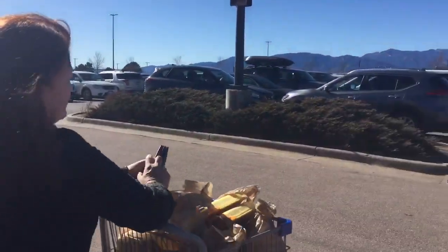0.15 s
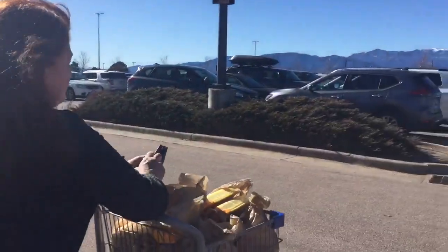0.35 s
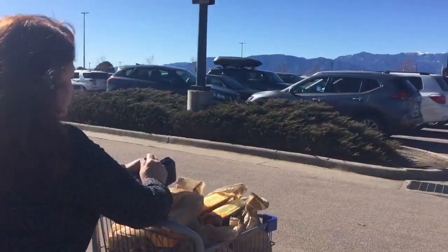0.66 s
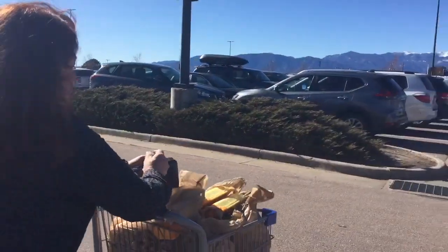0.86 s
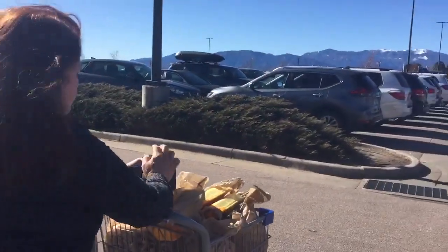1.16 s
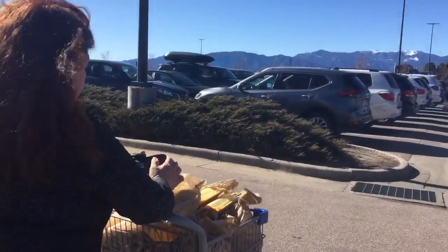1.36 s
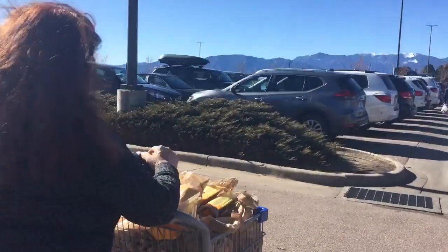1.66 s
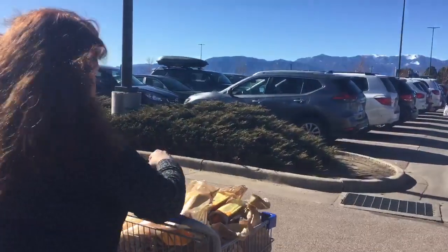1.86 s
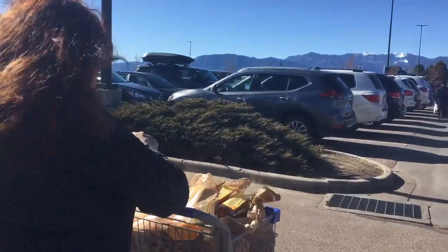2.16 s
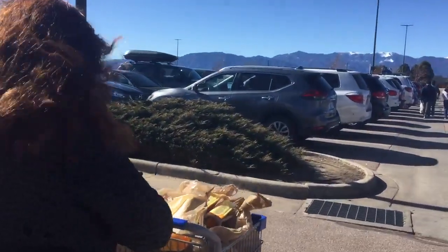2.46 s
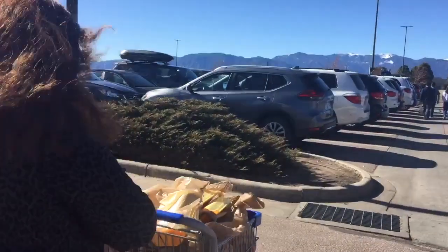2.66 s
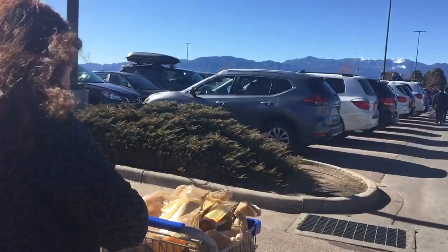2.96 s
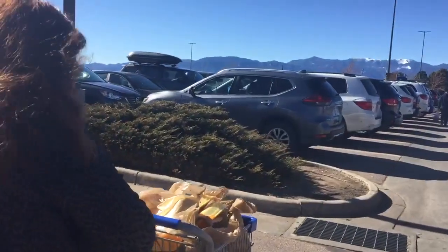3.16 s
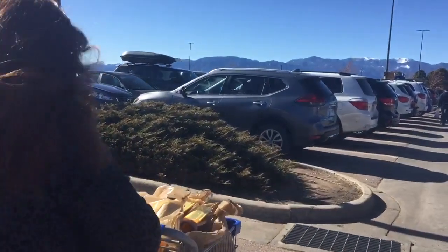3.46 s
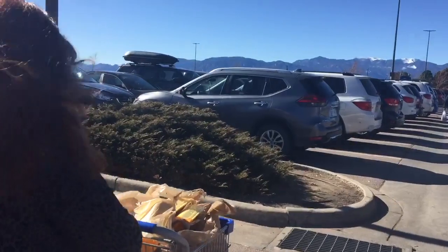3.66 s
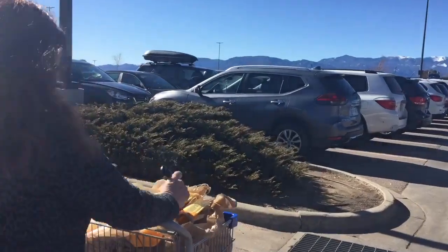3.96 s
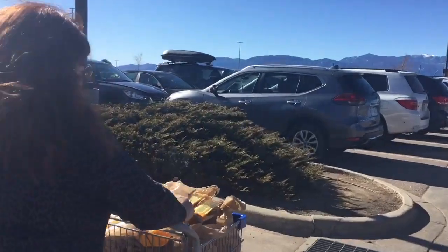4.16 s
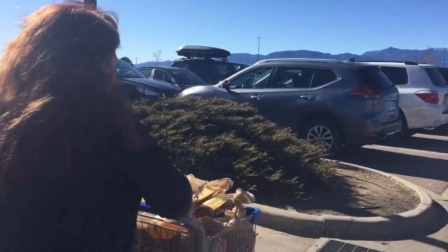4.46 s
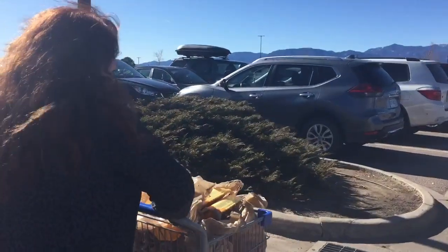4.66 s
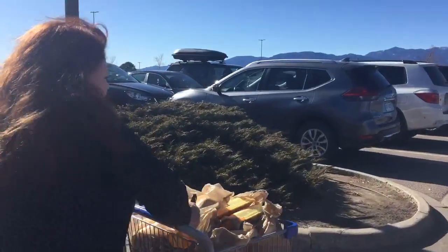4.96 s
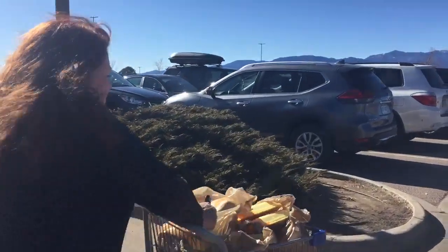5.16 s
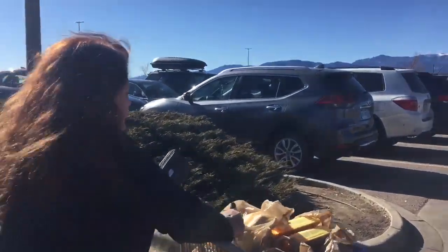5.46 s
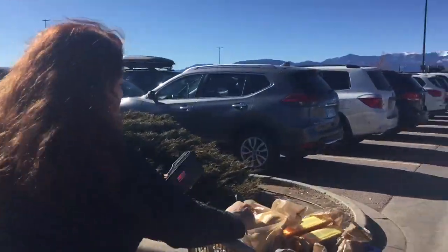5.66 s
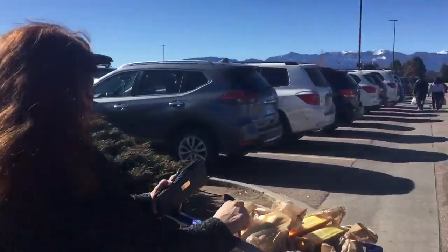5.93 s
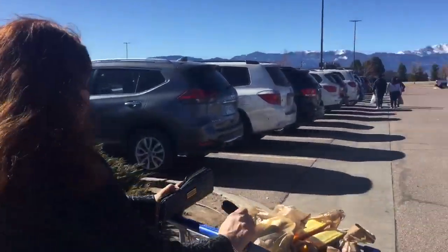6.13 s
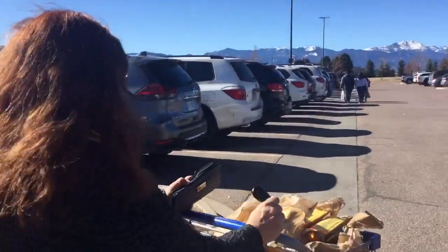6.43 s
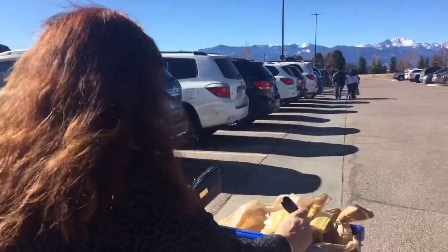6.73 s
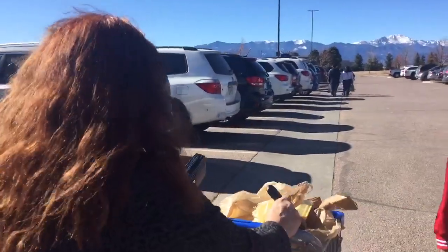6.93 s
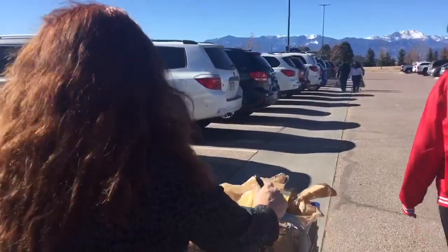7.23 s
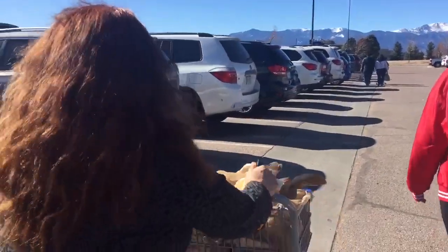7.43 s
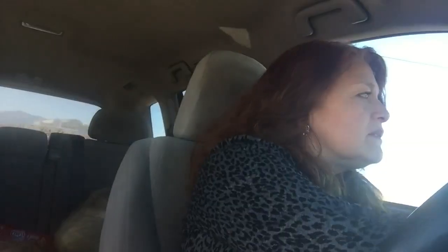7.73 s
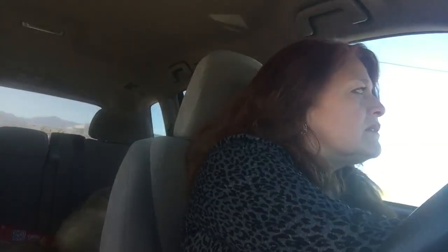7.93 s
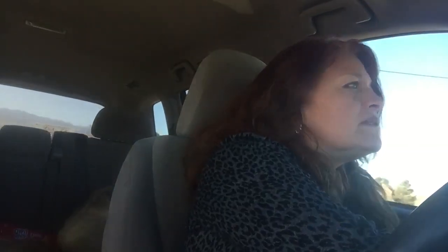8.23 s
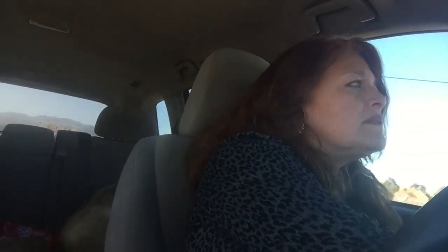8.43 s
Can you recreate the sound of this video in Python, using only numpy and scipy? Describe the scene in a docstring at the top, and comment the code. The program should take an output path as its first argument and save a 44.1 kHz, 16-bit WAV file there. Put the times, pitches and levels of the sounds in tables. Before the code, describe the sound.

Outdoors in an open parking lot, a loaded wire shopping cart chatters and jingles over grit, with wheels growling and bumps clashing the wires. Heavy wind gusts buffet and clip a handheld microphone, easing later. The cart nearly stops around the middle, then rolls on with its loudest clashes. A hard cut leads to a moving car's low, enclosed road rumble, ending with a tight click pair and a hollow knock.

```python
"""In a paved parking lot a loaded wire shopping cart is pushed along, then the cabin of a moving car is heard.
The cart is chattering wire contacts, shaken by random grit kicks and jolted by bumps; its wheels growl.
Wind is shaped turbulent noise in gusts, with short eddies slapping the microphone and clipping at full scale.
The cabin is filtered road noise with a swelling boom and tyre hiss. Clicks, one outdoors and a close pair
in the car, are decaying noise with ringing modes; a soft knock in the car is a decaying sine."""
import sys
import numpy as np
from scipy import signal
from scipy.fft import rfft, irfft
from scipy.io import wavfile
from scipy.ndimage import uniform_filter1d

SR = 44100
rng = np.random.default_rng(int(sys.argv[2]) if len(sys.argv) > 2 else 0)


def transcribe(signal):
    """Save signal, clipped to [-1, 1], as a 16-bit WAV file at the path in sys.argv[1]."""
    frames = np.atleast_2d(signal).T
    limited = np.clip(frames, -1, 1)
    pcm = np.round(limited * 32767).astype(np.int16)
    wavfile.write(sys.argv[1], SR, pcm)


N = 378812
TIME = np.arange(N) / SR
CUT_S = 7.632  # the car cabin replaces the parking lot
CUTOFF_HZ = 15800

# Levels and gains in the tables are relative: the functions add offsets or normalise.
# Steady hum of the lot, spectrum: [frequency_hz, gain_db]
LOT_SPECTRUM = [(20, -15.5), (50, 21.5), (150, -16.5), (300, 1.5), (450, -21), (700, -0.5), (1300, -4.5),
                (2500, -21.5), (5000, -35), (15000, -47)]
# Shaking of the basket as the cart rolls, nearly stopping at about 4.5 s: [time_s, level_db]
ROLL_LEVEL = [(0.0, -32), (0.83, -32), (1.02, -29.5), (1.63, -31), (1.8, -30), (2.89, -31.5), (3.05, -34.5),
              (3.99, -32), (4.43, -48), (4.65, -43), (4.88, -31.5), (5.39, -29), (6.45, -28), (6.73, -29),
              (7.45, -33), (7.62, -48)]
# Car cabin, spectrum: [frequency_hz, gain_db]
CABIN_SPECTRUM = [(20, -47), (45, -8.5), (75, -1.5), (130, -13), (250, -20), (400, -28.5), (650, -27.5),
                  (1100, -37), (1550, -31.5), (1750, -37.5), (2300, -38), (3000, -51.5), (4500, -65.5),
                  (15000, -73)]
# Boom and tyre resonances in the cabin: [frequency_hz, width_hz, gain_db]
CABIN_RESONANCES = [(79.3, 27, -7), (935, 76, 3), (1240, 110, 8.5)]
# Road noise in the cabin: [time_s, level_db, tyre_hiss_db]
ROAD_LEVEL = [(7.63, -21.5, -11), (7.85, -24, -0.5), (8.0, -20.5, -3), (8.2, -22, 4), (8.59, -22, 1)]
# Light breeze at the microphone between the gusts: [time_s, level_db]
BREEZE_LEVEL = [(0, -16.5), (1.0, -26), (1.4, -16.5), (2.0, -21.5), (2.7, -27.5), (3.2, -14.5), (3.65, -42),
                (4.3, -18), (4.8, -36.5), (5.4, -24.5), (6.1, -34), (7.6, -34)]
# Gusts that buffet the microphone, start being full strength: [start_s, hold_s, level_db]
WIND_GUSTS = [(0.0, 0.071, -11), (0.212, 0.18, -16.5), (0.383, 0.095, -10), (0.576, 0.053, -11),
              (0.724, .11, -10), (0.9, 0.06, -12.5), (1.353, 0.018, -14), (1.516, 0.12, -8),
              (1.691, 0.12, -12), (1.878, 0.026, -14.5), (2.059, 0.048, -7), (2.216, 0.036, -16.5),
              (2.344, 0.02, -6.5), (2.533, 0.029, -12.5), (2.856, 0.072, -21), (3.075, 0.021, -12.5),
              (3.279, .11, -10.5), (3.485, 0.034, -10.5), (3.787, 0.012, -19), (4.224, 0.098, -15.5),
              (4.574, 0.062, -18), (4.862, 0.029, -21.5), (5.038, .035, -21), (5.355, 0.015, -12.5),
              (5.439, 0.048, -13.5), (5.675, 0.3, -18), (6.104, 0.011, -22), (6.204, 0.0091, -26),
              (6.332, 0.011, -21), (6.666, 0.037, -17.5), (6.834, 0.037, -22.5)]
GUST_RISE_S, GUST_FALL_S = 0.016, 0.022
# Rumble of the wind, spectrum: [frequency_hz, gain_db]
WIND_SPECTRUM = [(12, -55.5), (25, -18), (37, -14), (60, 1.5), (100, -1.5), (170, -10.5), (280, -20.5),
                 (500, -41.5), (1000, -45), (2500, -93)]
# Single eddies that slap the microphone, crest relative to the level: [centre_s, level_db, crest_db]
EDDY_SLAPS = [(0.413, -3.5, -14), (0.498, -6.5, -6), (0.784, -4, -11.5), (0.818, -1.5, -20),
              (1.396, -5.5, -8.5), (1.585, -10, -4.5), (1.628, -9, -6), (1.726, -6, -26),
              (1.909, -11, -6.5), (2.086, -2.5, -13), (2.115, -19, 7.5), (2.432, -4.5, 0),
              (3.279, -23.5, 7.5), (3.319, -4, -5), (3.462, -16.5, 2.5), (3.505, -8, -14),
              (4.14, -10.5, -22), (4.238, -24, -15), (4.276, -5.5, -12), (4.49, -12.5, -29),
              (4.580, -15, -20), (5.052, -13, -5.5), (5.36, -9, -35), (5.775, -14.5, -3.5),
              (5.845, -7.5, -21)]
CREST_RISE_S = .002
# Small hard clicks: [start_s, level_db, upper_edge_hz, noise_t60_s]
CLICK_HITS = [(4.4224, -18, 4700, 0.0097), (8.3455, -16.5, 13000, 0.026), (8.35, -25, 10000, 0.056)]
# Modes that the clicks ring with: [pitch_hz, level_db, t60_s]
CLICK_RINGING = [(2250, 2, .045), (3639, -3, .04), (6137, 0, .04), (9060, -3, .035), (11000, -4, .035)]
# Bumps in the paving that clash the wires: [start_s, level_db, t60_s, treble_db]
PAVING_JOLTS = [(0.049, -22, 0.28, 2.5), (0.395, -27, 0.11, 9), (0.452, -23.5, 0.28, 5),
                (0.777, -20, 0.53, 3), (0.891, -27, 0.55, 6), (1.170, -24, 0.28, 8),
                (1.223, -19.5, 0.47, 7), (1.425, -22, 0.13, 2), (1.670, -22, 0.21, -3),
                (2.120, -40, .2, -4), (2.222, -34, 1, 11), (2.350, -25, 0.3, 7.5), (2.561, -24.5, 1, 3.5),
                (2.670, -17.5, .2, -0.5), (2.733, -17, 0.18, -4), (3.003, -21, 0.16, -17),
                (3.317, -24, 0.27, 6.5), (3.422, -32, 0.16, 8), (3.575, -25, 0.41, 1.5),
                (3.810, -36.5, 0.52, 10), (3.904, -21.5, 0.43, 3.5), (4.073, -39, 0.13, 14),
                (4.115, -29, 0.58, 3.5), (4.308, -30, 0.31, -24), (4.627, -33, .4, -1),
                (4.689, -27.5, 0.95, 2), (4.821, -22.5, 0.34, 1), (4.887, -16, 0.11, -2),
                (5.163, -20, 0.53, 6.5), (5.401, -27, 0.48, 5), (6.037, -35, .18, 12),
                (6.320, -20.5, 0.35, 4), (6.621, -19.5, 0.96, 6), (6.683, -14.5, 0.38, 7.5),
                (6.817, -16.5, 0.33, 6.5), (6.905, -28.5, 0.51, 11), (7.078, -22.5, 0.4, -4),
                (7.15, -14, 0.47, 2), (7.339, -22.5, 0.26, 5), (7.483, -25.5, 0.44, 4.5),
                (7.541, -25, 0.56, 1)]
JOLT_RISE_S = 0.0034
# Wires of the basket that ring most: [pitch_hz, level_db]
WIRE_MODES = [(2330, 6), (2412, 2), (2562, 1), (2735, 13), (3400, 12.5), (3585, 7.5), (3682, 8), (3811, -7),
              (4371, 11.5), (4595, 10), (5242, 10.5), (5407, 4.5), (5840, 13), (5952, -0.5), (8208, -15.5),
              (9024, 18), (9332, 8), (9530, 17), (11434, -4), (11779, 17), (13781, -16.5), (14618, -18.5),
              (14815, -4)]
WIRE_T60, MESH_T60 = .075, .11  # s
# Colouring filter of the rattling cart: [frequency_hz, gain_db]
RATTLE_SPECTRUM = [(210, -32), (350, -7), (520, -9.5), (703, -1.5), (851, -12), (1330, -4), (1460, -7.5),
                   (2390, 0), (3030, -7), (3490, -5), (4030, -6.5), (5890, -10), (9630, -15),
                   (10600, -16.5), (15500, -16.5)]
# Broad resonances of the basket frame: [frequency_hz, width_hz, gain_db]
FRAME_RESONANCES = [(686, 120, -8.5), (2360, 640, 12.5), (3490, 110, -1)]
USUAL_ROLL_DB, BRIGHTENING = -33, 0.73  # extra treble dB per dB of shaking above the usual


def from_db(db):
    """Decibels express a logarithm of amplitude; this inverts it."""
    return 10 ** (np.asarray(db) / 20)


def rms_one(x):
    """Normalise the mean power to 1."""
    return x / np.sqrt(np.mean(x ** 2) + 1e-20)


def unit_energy(x):
    """Normalise the total energy to 1."""
    return x / np.sqrt(np.sum(x ** 2) + 1e-20)


def in_time(rows):
    """Linear interpolation gives the columns of a curve at every sample."""
    s, *columns = np.transpose(rows)
    return [np.interp(TIME, s, c) for c in columns]


def add(track, s, sound):
    """Superposition: mix a sound in, starting at s seconds."""
    at = max(0, round(s * SR))
    track[at:at + len(sound)] += sound[:N - at]


def noise(count=N):
    """White noise: equal power at all frequencies."""
    return rng.standard_normal(count)


def butter(x, hz, kind, order=2):
    """Butterworth filtering: a maximally flat passband."""
    sos = signal.butter(order, np.minimum(hz, .45 * SR), kind, fs=SR, output="sos")
    return signal.sosfilt(sos, x)


def drift(rate_hz):
    """Low-passed noise: slow random fluctuation with spread 1."""
    step = 40  # samples between the computed points
    r = np.exp(-2 * np.pi * rate_hz * step / SR)
    # the first 2000 points let the filter settle
    slow = signal.lfilter([1], [1, -2 * r, r * r], noise(N // step + 2002))[2000:]
    return np.interp(np.arange(N) / step, np.arange(len(slow)), rms_one(slow))


def coloured(x, spectrum, size=8192):
    """Minimum-phase filtering: a folded cepstrum gives a causal response to the spectrum; rms 1."""
    hz, db = np.transpose(spectrum)
    grid = np.maximum(np.arange(size // 2 + 1) * SR / size, 1)
    gain_db = np.interp(np.log(grid), np.log(hz), db)
    cepstrum = irfft(np.log(from_db(gain_db)))
    cepstrum[1:size // 2] *= 2
    cepstrum[size // 2 + 1:] = 0
    response = irfft(np.exp(rfft(cepstrum)))
    return rms_one(signal.fftconvolve(x, response)[:N])


def evened(x, span_s):
    """Level control: hold the running rms near 1, keeping the faster grain."""
    size = max(8, int(span_s * SR))
    power = uniform_filter1d(uniform_filter1d(x ** 2, size), size)
    return x / np.sqrt(power + 1e-9)


def resonate(x, rows):
    """Parallel resonance: each mode passes a band around its own frequency."""
    out = 0
    for hz, width_hz, db in rows:
        out = out + from_db(db) * signal.lfilter(*signal.iirpeak(hz, hz / width_hz, fs=SR), x)
    return out


def modes(rows, t):
    """Modal decay: one blow excites damped sines, each with a random phase and strength."""
    out = 0
    for hz, db, t60 in rows:
        envelope = from_db(db + rng.normal(0, 1.5) - 60 * t / t60)
        out = out + envelope * np.sin(2 * np.pi * (hz * t + rng.random()))
    return out


def wheels(lot_db=-38, wheel_db=-14, grit_db=3):
    """Rolling contact: the wheels' growl on grit follows the basket's shaking, over the hum of the lot."""
    level_db, = in_time(ROLL_LEVEL)
    growl = rms_one(butter(noise(), [480, 850], "band"))
    growl *= from_db(grit_db * drift(12.0))
    hum = coloured(noise(), LOT_SPECTRUM)
    return from_db(level_db + wheel_db) * growl + from_db(lot_db) * hum


def cabin(bump_db=2, boom_hz=200, hiss_hz=1500):
    """Transmission and resonance: the car body filters road noise; boom swells, and tyre hiss varies."""
    level_db, hiss_db = in_time(ROAD_LEVEL)
    road = noise()
    inside = evened(coloured(road + resonate(road, CABIN_RESONANCES), CABIN_SPECTRUM), span_s=0.056)
    # these parts adjust the low and high bands already present
    bumps = butter(inside, boom_hz, "low", order=1) * (from_db(bump_db * drift(18)) - 1)
    hiss = butter(inside, hiss_hz, "high", order=1) * (from_db(hiss_db) - 1)
    return from_db(level_db) * (inside + bumps + hiss)


def wind_level(puff_db=3.5, puffs_hz=11):
    """Addition of powers: wind level in dB from a puffing breeze and gusts that rise, hold and fall."""
    breeze_db, = in_time(BREEZE_LEVEL)
    power = from_db(breeze_db + puff_db * np.clip(drift(puffs_hz), -2, 2)) ** 2
    for s, hold_s, db in WIND_GUSTS:
        corners_s = [s - GUST_RISE_S, s, s + hold_s, s + hold_s + GUST_FALL_S]
        shape = np.interp(TIME, corners_s, [0, 1, 1, 0])
        power += (from_db(db) * shape) ** 2
    return 10 * np.log10(power)


def wind(rumble_db=1.5, lump_db=2, flutter_hz=320, flutter_db=-11, flutter_lump_db=5.0,
         growth=2.04, strong_db=-12):
    """Turbulence: wind rumbles, and stronger gusts add higher-pitched whirls, up to a ceiling."""
    level_db = wind_level()
    lumps = np.clip(drift(22.8), -2, 2)
    rumble = evened(coloured(noise(), WIND_SPECTRUM), span_s=.025)
    rumble *= from_db(level_db + rumble_db + lump_db * lumps)
    flutter = butter(butter(noise(), flutter_hz, "low", order=3), 120, "high")
    flutter = evened(flutter, span_s=0.022)
    # flutter gains more than 1 dB per dB of wind, until 2 dB above strong_db
    whirl_db = strong_db + growth * np.minimum(level_db - strong_db, 2)
    flutter *= from_db(whirl_db + flutter_db + flutter_lump_db * lumps)
    return butter(rumble, 25, "high") + flutter


def eddies(width_s=0.0062, body_hz=210, body_db=1, edge_hz=540, edge_db=3, lead_s=0.0022,
           fade_s=0.0039, wake_db=-14, wake_s=0.016):
    """Vortex pressure pulses: a short low thud with an abrupt rough crest, in weaker churning air."""
    body = butter(butter(noise(), body_hz, "low", order=3), 104, "high")
    body = evened(body, span_s=0.012)
    crest = butter(butter(noise(), edge_hz, "low", order=3), 204, "high")
    crest = evened(crest, span_s=.006)
    thud, snap = np.zeros(N), np.zeros(N)
    t = np.arange(-SR // 50, SR // 8) / SR  # zero at the centre of the thud
    rise = np.clip(1 + (t + lead_s) / CREST_RISE_S, 0, 1)
    slap = rise * np.exp(-np.maximum(t + lead_s, 0) / fade_s)
    wake = from_db(wake_db) * np.exp(-np.abs(t) / wake_s) * np.clip(1 - t / t[0], 0, 1)
    for s, db, crest_db in EDDY_SLAPS:
        add(thud, s + t[0], from_db(db + body_db) * np.exp(-.5 * (t / width_s) ** 2))
        add(snap, s + t[0], from_db(db + crest_db + edge_db) * (slap + wake))
    return thud * body + snap * crest


def small_hits(ring_db=-19, knock_s=8.463, knock_hz=640, knock_db=-15, knock_t60=0.034):
    """Impulse response: hard clicks excite damped modes, and the car's trim gives one hollow knock."""
    out, t = np.zeros(N), np.arange(SR // 8) / SR
    for s, db, top_hz, t60 in CLICK_HITS:
        crack = butter(noise(len(t)), 1800, "high") * from_db(-60 * t / t60)
        ringing = from_db(ring_db) * modes(CLICK_RINGING, t)
        add(out, s, from_db(db) * butter(crack + ringing, top_hz, "low"))
    knock = from_db(knock_db - 60 * t / knock_t60) * np.sin(2 * np.pi * knock_hz * t)
    add(out, knock_s, knock)
    return out


def basket_blow(wire_db=-7, mesh_db=1, tick_t60=0.013):
    """Impact excitation: a dry tick, the shimmer of the whole mesh, and the strongest wires ringing."""
    t = np.arange(SR // 5) / SR
    tick = unit_energy(noise(len(t)) * from_db(-60 * t / tick_t60))
    mesh = unit_energy(noise(len(t)) * from_db(-60 * t / MESH_T60))
    wires = unit_energy(modes([(hz, db, WIRE_T60) for hz, db in WIRE_MODES], t))
    return tick + from_db(mesh_db) * mesh + from_db(wire_db) * wires


def chatter(contacts_per_s=1200, size_db=1.5, places=4):
    """Random impacts: loose wires touch at several places, each with its own ring."""
    out = np.zeros(N)
    for _ in range(places):
        touches = rng.random(N) < contacts_per_s / places / SR
        sizes = from_db(size_db * np.minimum(rng.exponential(1, N), 4)) * rng.choice([-1, 1], N)
        out += signal.fftconvolve(touches * sizes, basket_blow())[:N]
    return evened(coloured(out, RATTLE_SPECTRUM), span_s=0.015)


def grit_kicks(per_s=24, rise_s=.002, fade_s=0.018, steady=0.43):
    """Shot excitation: stones kick the wheels at random, each rising quickly and fading; even mean power."""
    kicks = (rng.random(N) < per_s / SR) * rng.uniform(0.38, 2.26, N)
    fading = signal.lfilter([1], [1, -np.exp(-1 / (fade_s * SR))], kicks + 1e-18)
    keep = np.exp(-1 / (rise_s * SR))
    power = steady + signal.lfilter([1 - keep], [1, -keep], fading)
    return evened(np.sqrt(power), span_s=0.11)


def jolt_power(t, db, t60):
    """Exponential decay: a clash swells within a few milliseconds and dies away."""
    return np.minimum(t / JOLT_RISE_S, 1) * from_db(db - 60 * t / t60) ** 2


def cart(shake_db=2.5, top_flicker_db=1.95, split_hz=5000, frame_db=-11, clatter_db=-10,
         clatter_low_hz=600, clatter_high_hz=2100):
    """Forced vibration: the basket chatters, brighter when shaken harder; bumps add dying clashes."""
    level_db, = in_time(ROLL_LEVEL)
    wires = chatter()
    clash, top_clash = np.zeros(N), np.zeros(N)  # powers
    t = np.arange(SR // 2) / SR
    for s, db, t60, treble_db in PAVING_JOLTS:
        add(clash, s, jolt_power(t, db, t60))
        add(top_clash, s, jolt_power(t, db + treble_db, t60))
    shaking = from_db(level_db + shake_db) * grit_kicks()
    # hard shaking brings out the treble, which also flickers
    dull = butter(wires, split_hz, "low", order=3)
    bright = butter(wires, split_hz, "high", order=3)
    top = from_db(top_flicker_db * drift(7) + BRIGHTENING * (level_db - USUAL_ROLL_DB))
    rattle = dull * np.sqrt(shaking ** 2 + clash)
    rattle += bright * np.sqrt((shaking * top) ** 2 + top_clash)
    # the frame rings along, broad and low, however dull the shaking
    frame = evened(resonate(wires, FRAME_RESONANCES), span_s=0.12)
    # on bumps the wheels and the load clatter too, lower than the wires
    clatter = rms_one(butter(noise(), [clatter_low_hz, clatter_high_hz], "band"))
    return rattle + frame * from_db(level_db + frame_db) + clatter * np.sqrt(clash) * from_db(clatter_db)


def scene():
    """Superposition: outdoor sources until the cut, then the cabin; the small hits sound in both."""
    inside = np.clip((TIME - CUT_S) / .004, 0, 1)
    outdoors = cart() + wheels() + wind() + eddies()
    return ((1 - inside) * outdoors + inside * cabin() + small_hits())[None]


def record(dry):
    """Overload and band limiting: peaks beyond full scale clip, then a steep low-pass cuts the top."""
    sos = signal.ellip(10, .1, 70, CUTOFF_HZ, fs=SR, output="sos")
    return signal.sosfilt(sos, np.clip(dry, -1, 1))


dry = scene()
out = record(dry)
transcribe(out)
```